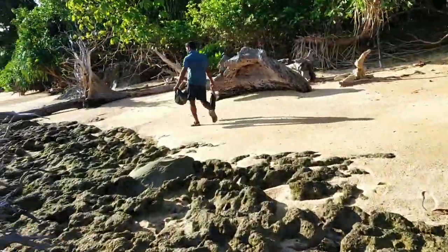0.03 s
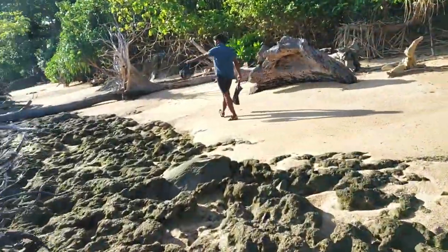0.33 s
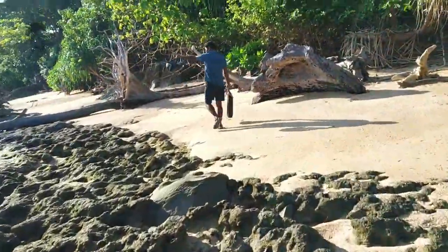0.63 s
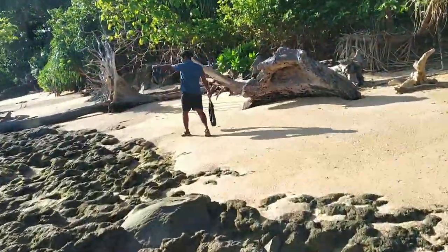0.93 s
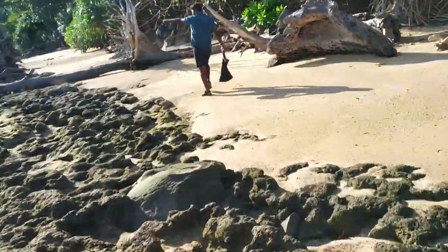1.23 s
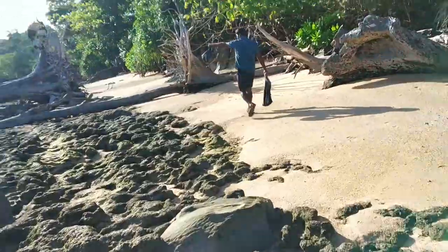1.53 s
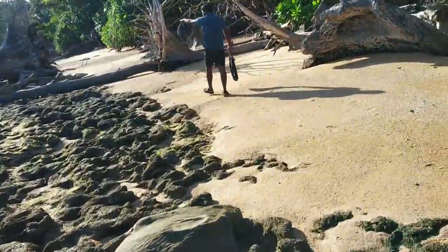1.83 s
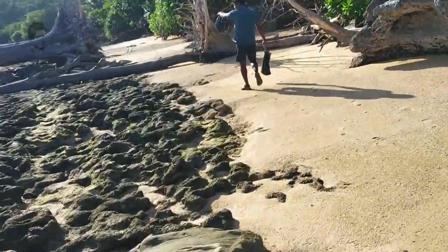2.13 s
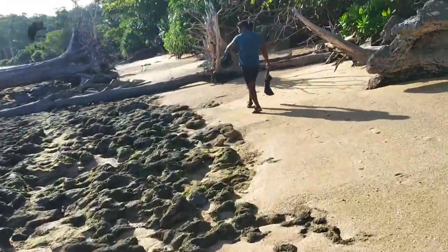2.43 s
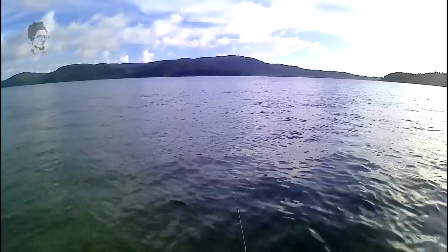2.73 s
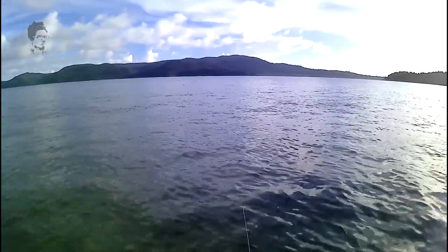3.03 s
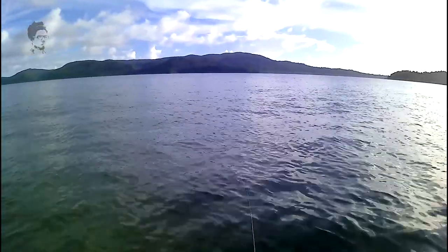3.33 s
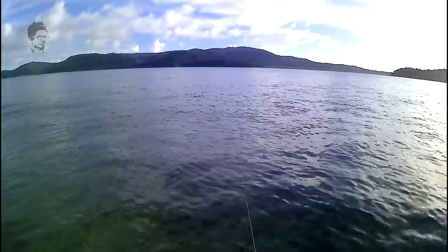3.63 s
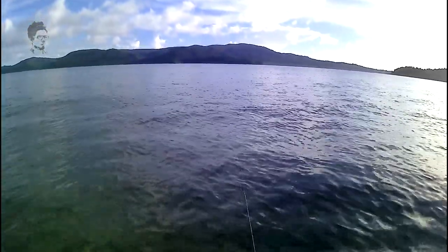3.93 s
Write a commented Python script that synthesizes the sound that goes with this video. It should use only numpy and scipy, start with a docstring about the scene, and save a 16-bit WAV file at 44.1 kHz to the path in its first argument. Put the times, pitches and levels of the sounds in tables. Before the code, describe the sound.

Footsteps thud and crunch on damp sand, about two a second, over faint shore wash, while a hand rubs and taps near the right microphone. A hard cut brings a dull rush of open sea with wind buffeting.

```python
"""Beach walk, then open sea

Steps on damp sand, about two a second, knock, thud and crunch, each with a lighter scuff after it.
A hand rubs, taps and bumps the camera case by the right microphone, over faint shore wash and hiss.
Then a hard cut to open sea: a dull, steady rush of air and water, with wind buffeting a mono microphone."""
import sys
import numpy as np
from scipy.fft import rfft, irfft, next_fast_len
from scipy.io import wavfile
from scipy.ndimage import uniform_filter1d, map_coordinates

SR = 44100
rng = np.random.default_rng(int(sys.argv[2]) if len(sys.argv) > 2 else 0)


def wav_record(signal):
    """Record a signal, one row per channel, as 16-bit PCM in the file named by sys.argv[1]."""
    frames = np.transpose(np.atleast_2d(signal))
    bounded = np.clip(frames, -1, 1)
    # unit amplitude maps onto the largest positive 16-bit level
    quanta = np.round(bounded * 32767).astype(np.int16)
    wavfile.write(sys.argv[1], SR, quanta)


N = 176400

# beach bed: calm water, microphone hiss, one lapping swish (frequency [Hz], level [dB])
WASH_EQ = [(25, -48), (60, -32), (110, -23), (200, 4), (400, 7.5), (1000, -3), (2000, -11), (5000, -22),
           (15000, -38.5)]
HISS_EQ = [(100, -5), (3000, -2), (7500, -5.5), (10000, 1), (11500, -4.5), (15000, -2.5)]
SWISH_EQ = [(300, -7), (700, -3.5), (1150, 9), (1600, -26.5), (4000, -30.5)]
# wash at each microphone (left [dB], right [dB])
WASH_LEVELS = [-59.5, -50.5]
# swells of the hand rubbing the case (time [s], level [dB])
RUB_ENVELOPE = [(0.0, -59), (0.1, -56.5), (0.24, -58.5), (0.47, -54.5), (0.62, -51.5), (1.16, -52.5),
                (1.31, -48.5), (1.56, -76.5), (1.72, -45), (1.84, -46.5), (2.07, -64.5), (2.25, -56),
                (2.4, -47.5), (2.51, -52.5), (2.7, -45.5)]
# the case when rubbed, and when clicked by a finger (frequency [Hz], level [dB])
RUB_EQ = [(25, -56.5), (60, -29), (100, -12.5), (200, 2), (300, -5.5), (500, -11.5), (800, -27),
          (2000, -33.5), (6000, -69.5)]
CLICK_EQ = [(300, -3), (700, 11), (1200, 11), (1700, 0.5), (2400, 5), (3600, -25), (5000, -45),
            (15000, -55)]
# a foot pressing into sand (time [s], attack [s], hold [s], release per 20 dB [s], thud [dB],
# crunch [dB], grit [dB], hollow pitch [Hz], hollow level [dB])
STEPS = [(0.007, 0.002, 0.012, 0.04, -42, -31.5, -49.5, 800, -37),
         (0.025, 0.003, 0.014, 0.02, -42, -33, -47, 620, -36),
         (0.076, 0.025, 0.0054, 0.089, -62, -45, -51.5, 490, -47),
         (0.201, .02, .003, 0.022, -46, -44, -65, 1000, -45),
         (0.566, 0.006, 0.005, 0.03, -42, -32.5, -49.5, 900, -38.5),
         (0.585, 0.003, 0.008, 0.045, -36.5, -34.5, -47, 600, -43),
         (0.633, 0.0097, 0.0018, 0.025, -35, -41.5, -55, 452, -46),
         (1.071, 0.003, 0.018, .018, -30, -30, -45.5, 760, -28),
         (1.102, 0.012, 0.06, 0.05, -70, -47, -57.5, 850, -50.5),
         (1.52, 0.011, 0.012, 0.0061, -35.5, -31.5, -52.5, 800, -33.5),
         (1.543, .0015, .006, 0.0061, -28, -28.5, -31.5, 900, -25.5),
         (1.556, 0.0018, 0.011, 0.024, -47.5, -35, -47.5, 1230, -44.5),
         (1.581, .012, 0.0027, 0.035, -45, -32.5, -45.5, 1140, -33.5),
         (2.061, 0.0019, 0.01, 0.06, -37, -35, -45.5, 610, -49),
         (2.166, 0.0084, 0.0055, 0.021, -44.5, -40, -61, 1040, -41.5),
         (2.537, 0.024, 0.019, 0.025, -40.5, -37.5, -47.5, 516, -40),
         (2.601, 0.017, 0.033, 0.066, -53, -45.5, -53, 400, -55)]
# heel and sole striking firm sand (time [s], level [dB], pitch [Hz], attack [s])
SOLE_KNOCKS = [(0.0065, -22, 560, .002), (0.0265, -25, 490, 0.0023), (0.0345, -29.5, 560, 0.002),
               (0.5672, -20.5, 450, 0.0012), (0.5872, -26, 543, .002), (1.0625, -31, 520, 0.0019),
               (1.0725, -23.5, 420, 0.0029), (1.0865, -27, 640, .0025), (1.531, -25.5, 450, 0.0022),
               (1.540, -27, 360, .0018), (1.5444, -16.5, 740, 0.0026), (2.064, -30.5, 430, 0.0034),
               (2.5605, -30, 540, 0.0025), (2.574, -32, 420, 0.002)]
# weight landing, sand packing, grains rubbing (frequency [Hz], level [dB])
THUD_EQ = [(25, -53), (60, -31.5), (100, -29), (190, 3), (300, 6.5), (450, -3), (900, -28.5), (3000, -66.5)]
CRUNCH_EQ = [(30, -62), (100, -19), (280, -6), (480, 4), (900, 2.5), (1400, -7), (2300, -15.5),
             (4000, -22.5), (8000, -48), (16000, -47.5)]
GRIT_EQ = [(600, -26.5), (1800, 5), (3000, -4), (4500, 0), (6500, -8.5), (9500, -8.5), (11500, -9),
           (15000, -6)]
# stereo tilt of the fine grit (frequency [Hz], left over right [dB])
GRIT_PAN = [(1500, -3), (4500, -2), (8000, 5), (15000, 0.5)]
# coarse grains and shell bits snapping (time [s], level [dB])
SHELL_SNAPS = [(0.102, -45), (1.072, -40), (1.079, -32), (1.595, -46), (2.0625, -39), (2.579, -30.5),
               (2.612, -37.5), (2.629, -32), (2.636, -34), (2.64, -41), (2.650, -41), (2.661, -33)]
# fingers striking the case (time [s], level [dB], pitch [Hz], click level [dB], attack [s])
FINGER_TAPS = [(0.176, -36.5, 465, -46.5, 0.0046), (0.259, -40.5, 540, -66, 0.0025),
               (0.332, -38, 470, -71, 0.003), (0.608, -32.5, 482, -50, 0.0035),
               (0.716, -34, 446, -47.5, 0.0039), (0.797, -36, 486, -52, 0.0023),
               (1.1505, -33, 487, -34.5, 0.004), (1.173, -35.5, 527, -45.5, 0.0027),
               (1.248, -23.5, 479, -48, 0.0025), (1.257, -27, 497, -42.5, 0.003),
               (1.374, -43.5, 497, -56, 0.0027), (1.655, -34.5, 491, -50, 0.0042),
               (1.7106, -34, 472, -40, 0.0031), (1.813, -32.5, 550, -55, 0.0036),
               (1.826, -30, 438, -55, 0.0024), (1.919, -38, 470, -46.5, 0.0024),
               (2.032, -38.5, 492, -54, 0.0031), (2.042, -42.5, 464, -66, 0.0035),
               (2.16, -35, 535, -44, 0.0054), (2.313, -38.5, 446, -48.5, 0.0022),
               (2.366, -40.5, 485, -54, 0.0055), (2.407, -31, 467, -36, 0.0025)]
# soft bumps of the grip (time [s], level [dB], pitch [Hz], left over right [dB])
GRIP_BUMPS = [(0.454, -28.5, 198, -19.5), (0.55, -32.5, 243, -19), (0.638, -30, 228, -18),
              (0.775, -28, 212, -34.5), (0.844, -34, 211, 24), (0.914, -32.5, 204, -25.0),
              (0.941, -28.5, 232, -37.5), (0.956, -27.5, 193, -31), (0.985, -36.5, 188, -27),
              (1.328, -35, 215, -24), (1.738, -32.5, 212, -36), (1.757, -22.5, 220, -42),
              (1.786, -27.5, 266, -36), (1.815, -32, 183, -40), (1.826, -26, 233, -44),
              (2.37, -35.5, 216, -32), (2.497, -34.5, 197, -34), (2.537, -28, 186, -34),
              (2.621, -32, 195, -27), (2.688, -35, 226, -29)]
# scrapes and squeaks (time [s], half-width [s], pitch [Hz], bandwidth over pitch [ratio], level [dB])
SLIPS = [(0.645, 0.0081, 4700, 0.17, -50), (0.988, 0.003, 1700, .25, -47.5),
         (1.514, 0.001, 1100, 0.34, -36), (0.642, 0.0017, 2500, 0.45, -45),
         (1.825, 0.014, 1020, 0.45, -47.5), (1.276, 0.001, 1500, 0.6, -48), (1.99, 0.002, 6600, 0.4, -56),
         (2.406, .002, 3370, 0.43, -48), (2.635, 0.013, 5300, 0.64, -49.5)]
# rush of the open sea, and wind rumble (frequency [Hz], level [dB])
SEA_EQ = [(88, -21.5), (150, -3), (205, -3.5), (418, -3.5), (468, -6.5), (804, -4.5), (1530, -11),
          (2270, -23.5), (2940, -30), (3790, -44.5), (4020, -54.5), (4250, -75.5), (4500, -77),
          (5850, -116), (9900, -120)]
WIND_EQ = [(8, -13.5), (20, 1.5), (32, -1.5), (45, -4.5), (56, -6.5), (72, -10), (100, -19.5), (122, -17.5),
           (150, -30), (400, -63.5), (1500, -110)]
# gusts hitting the microphone (time [s], level [dB])
WIND_ENVELOPE = [(2.73, -24), (2.828, -36), (2.95, -25.5), (2.982, -19), (3.058, -29), (3.168, -20.5),
                 (3.2, -31), (3.23, -20), (3.27, -25.5), (3.316, -38), (3.35, -26.5), (3.402, -29),
                 (3.416, -23.5), (3.558, -23), (3.574, -29.5), (3.656, -26), (3.688, -33), (3.754, -31.5),
                 (3.806, -17), (3.848, -28), (3.884, -24), (3.918, -27.5), (3.944, -19), (3.99, -23)]

CUT_S = 2.721  # the beach ends and the sea begins
CASE_LEFT_DB = -24.5  # rubbing and taps barely reach the left microphone
SAG_SHARE, SAG_S = 0.17, 0.0016  # a struck pitch starts this much higher and settles this fast


def amp(db):
    """Decibels to gain."""
    return 10 ** (np.asarray(db) / 20)


def pan(left_db):
    """Stereo gains: left at left_db, right at unity."""
    return amp([[left_db], [0]])


def unit(x):
    """Scale to rms 1."""
    return x / np.sqrt(np.mean(x ** 2) + 1e-20)


def clock():
    """Time of each sample."""
    return np.arange(N) / SR


def swell(centre_s, width_s):
    """A bell-shaped envelope of peak 1."""
    return np.exp(-((clock() - centre_s) / width_s) ** 2 / 2)


def filtered(x, response):
    """x through a frequency response."""
    size = next_fast_len(N + SR // 2)
    return irfft(rfft(x, size) * response(np.fft.rfftfreq(size, 1 / SR)), size)[..., :N]


def equalised(x, eq):
    """x through an EQ curve drawn on a log frequency axis."""
    points_hz, db = np.transpose(eq)
    return filtered(x, lambda hz: amp(np.interp(np.log(hz + 1), np.log(points_hz + 1), db)))


def noise(eq):
    """Coloured noise of rms 1."""
    return unit(equalised(rng.standard_normal(N), eq))


def band_noise(centre_hz, width):
    """Noise through a steep-sided resonance, at rms 1."""
    white = rng.standard_normal(N)
    return unit(filtered(white, lambda hz: 1 / (1 + ((hz / centre_hz - centre_hz / (hz + 1)) / width) ** 2)))


def wobble(rate):
    """A smooth random curve, rate knots a second."""
    knots = rng.standard_normal(int(N * rate / SR) + 4)
    return map_coordinates(knots, [clock() * rate], mode="nearest")


def steadied(x, span_s):
    """x with swells longer than span_s levelled out."""
    power = np.abs(uniform_filter1d(x * x, max(int(span_s * SR), 2)))
    return x / np.sqrt(power + .02)


def ring(start, hz, attack, sag=0):
    """A softly struck, heavily damped resonance; its pitch may settle from above."""
    age = np.maximum(clock() - start, 0)
    envelope = (age / attack * np.exp(1 - age / attack)) ** 1.33
    bend = sag * SAG_S * (1 - np.exp(-age / SAG_S))
    return envelope * np.sin(2 * np.pi * hz * (age + bend))


def shore_wash():
    """Calm water washes faintly, drifting in level on each side."""
    return np.array([amp(db + 0.8 * wobble(4.6)) * noise(WASH_EQ) for db in WASH_LEVELS])


def hiss(level_db=-58.5, waver_db=0.84):
    """Each microphone has its own slightly wavering hiss."""
    return np.array([amp(level_db + waver_db * wobble(9)) * noise(HISS_EQ) for side in "LR"])


def hand_rub(trim_db=4, flutter_db=4.3):
    """The hand's friction carries through the case as a low, uneven rustle."""
    level_db = np.interp(clock(), *np.transpose(RUB_ENVELOPE)) + trim_db + flutter_db * wobble(34.99)
    return pan(CASE_LEFT_DB) * amp(level_db) * noise(RUB_EQ)


def grains(eq, per_s=2000, scatter_db=2.5):
    """Sand grains make tiny slips of uneven size at random moments."""
    sizes = rng.standard_normal(N) * amp(scatter_db * rng.standard_normal(N))
    slips = (rng.random(N) < per_s / SR) * sizes
    return unit(equalised(slips, eq))


def crackle(per_s=700, centre_hz=2480, log_spread=0.45, decay_cycles=2.5):
    """Coarse grains each tick for a few cycles at their own pitch."""
    when, pitch, size = rng.random((int(per_s * N / SR), 3)).T
    hz = centre_hz * np.exp(log_spread * np.sqrt(12) * (pitch - .5))
    age = np.arange(SR // 200)
    cycles = hz[:, None] * age / SR
    strength = size[:, None] ** 3.5  # a few grains stand out
    ticks = strength * np.exp(-cycles / decay_cycles) * np.sin(2 * np.pi * cycles)
    at = (when * N).astype(int)[:, None] + age
    return steadied(unit(np.bincount(at.ravel(), ticks.ravel(), N)[:N]), 0.03)


def grit(envelope, clump_db=1.5, clumps_per_s=300, snap_t60_s=0.0025):
    """The top end of a step: fine sand gives way in clumps, shell bits snap, coarse grains crackle."""
    t = clock()
    spray = envelope * unit(amp(clump_db * wobble(clumps_per_s)))
    snaps = sum(amp(db - 60 * np.abs(t - start) / snap_t60_s) * (t > start) for start, db in SHELL_SNAPS)
    left, right = [spray * grains(GRIT_EQ) + snaps * noise(GRIT_EQ) for side in "LR"]
    coarse = amp(-1) * pan(-2) * envelope * np.array([crackle(), crackle()])
    return coarse + np.array([equalised(left, GRIT_PAN), right])


def footsteps(knock_trim_db=0.5, left_lead_s=0.00028):
    """The sole knocks, the weight thuds, and the sand packs with a gritty crunch and a hollow note."""
    t, envelopes, hollow = clock(), np.zeros((3, N)), np.zeros(N)
    for start, attack, hold, release, thud_db, crunch_db, grit_db, hollow_hz, hollow_db in STEPS:
        decay = amp(-20 * np.maximum(t - start - attack - hold, 0) / release)
        press = np.clip((t - start) / attack, 0, 1) * decay
        envelopes += amp([[thud_db], [crunch_db], [grit_db]]) * press
        hollow += amp(hollow_db) * press * steadied(band_noise(hollow_hz, width=0.23), 0.031)
    thud_env, crunch_env, grit_env = envelopes
    thud = thud_env * steadied(noise(THUD_EQ), 0.03)
    knocks = sum(amp(db + knock_trim_db) * ring(start, hz, attack, SAG_SHARE)
                 for start, db, hz, attack in SOLE_KNOCKS)
    body = knocks + hollow + crunch_env * steadied(grains(CRUNCH_EQ), 0.028)
    spread = crunch_env * grains(CRUNCH_EQ)  # separate grains on the left add width
    early_body = filtered(body, lambda hz: np.exp(2j * np.pi * hz * left_lead_s))
    left = amp(-9.5) * (thud + spread) + amp(-15) * early_body
    return np.array([left, thud + body]) + grit(grit_env)


def finger_taps(tone_trim_db=6, click_trim_db=8.5, click_attack_s=0.00094, click_t60_s=0.027):
    """Each finger strike rings the case briefly, with a noisy click on top."""
    t, tones, click_env = clock(), np.zeros(N), np.zeros(N)
    for start, db, hz, click_db, attack in FINGER_TAPS:
        tones += amp(db + tone_trim_db) * ring(start, hz, attack, SAG_SHARE)
        onset = np.clip((t - start) / click_attack_s, 0, 1)
        click_env += onset * amp(click_db + click_trim_db - 60 * np.abs(t - start) / click_t60_s)
    return pan(CASE_LEFT_DB) * (tones + click_env * steadied(noise(CLICK_EQ), 0.0068))


def grip_bumps(trim_db=3, attack_s=0.0049):
    """The grip nudges the case into low, soft thumps, nearly all on the right."""
    out = np.zeros((2, N))
    for start, db, hz, left_db in GRIP_BUMPS:
        sides = pan(left_db) / np.linalg.norm(pan(left_db))
        out += sides * amp(db + trim_db) * ring(start, hz, attack_s)
    return out


def scrapes():
    """Brief slips each rub one band of noise into a scrape or squeak."""
    return pan(-9) * sum(amp(db) * swell(centre, span) * band_noise(hz, width)
                         for centre, span, hz, width, db in SLIPS)


def swish(level_db=-51.5):
    """Water laps the shore once, softly."""
    return pan(-11) * amp(level_db) * swell(centre_s=1.5, width_s=0.072) * noise(SWISH_EQ)


def cut_click(level_db=-41.5):
    """A tiny burst of bright noise marks the cut to the sea."""
    return amp(level_db) * swell(CUT_S, width_s=0.0006) * band_noise(centre_hz=2700, width=0.85)


def sea_rush(level_db=-37.5, waver_db=1.1):
    """Air and open water blend into a dull, even rush."""
    return amp(level_db + waver_db * wobble(8)) * noise(SEA_EQ)


def wind_buffet(trim_db=1):
    """Gusts press on the microphone as a lumpy, deep rumble."""
    level_db = np.interp(clock(), *np.transpose(WIND_ENVELOPE)) + trim_db
    return amp(level_db) * steadied(noise(WIND_EQ), 0.07)


def scene(low_cut_hz=65):
    """The stereo beach with its bass rolled off, then a hard cut to the mono sea."""
    t = clock()
    beach = footsteps() + scrapes() + finger_taps() + grip_bumps() + hand_rub()
    beach += shore_wash() + swish() + hiss()
    beach = filtered(beach, lambda hz: hz ** 2 / np.hypot(hz ** 2, low_cut_hz ** 2))
    at_sea = np.clip((t - CUT_S) / .002, 0, 1)
    fade_out = np.clip((t[-1] - t) / .004, 0, 1)
    return (1 - at_sea) * beach + cut_click() + at_sea * fade_out * (sea_rush() + wind_buffet())


def record(dry, top_hz=15750):
    """The camera's band limit: a steep high cut on the whole mix."""
    return filtered(dry, lambda hz: np.clip((top_hz - hz) / 200 + .5, 0, 1))


dry = scene()
out = record(dry)
wav_record(out)
```